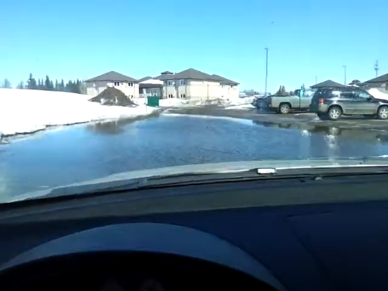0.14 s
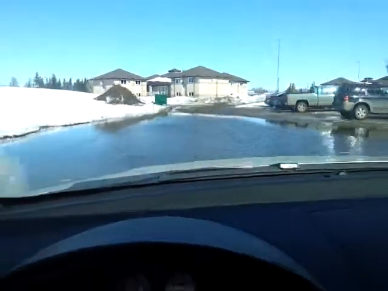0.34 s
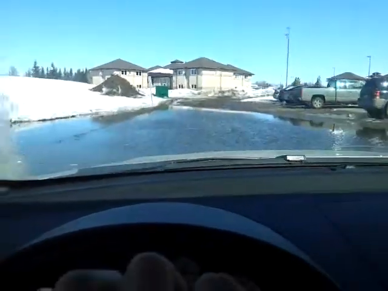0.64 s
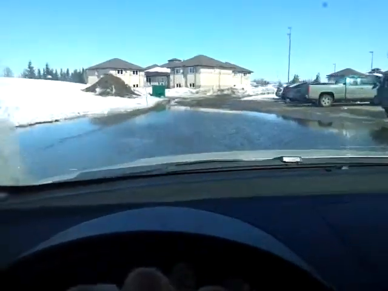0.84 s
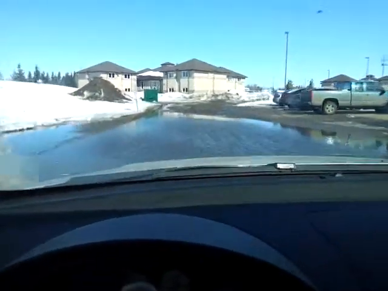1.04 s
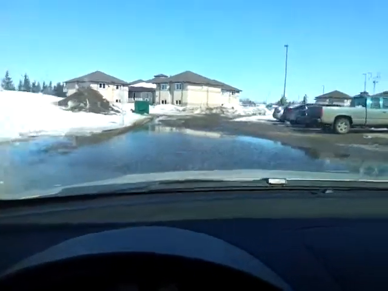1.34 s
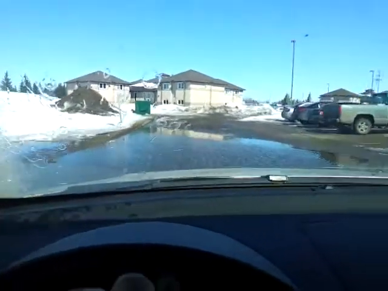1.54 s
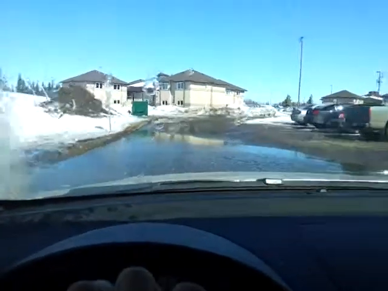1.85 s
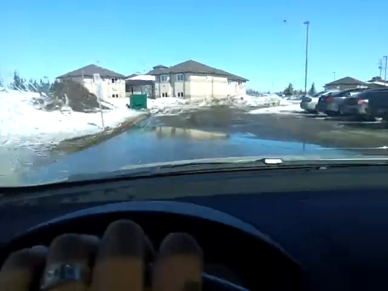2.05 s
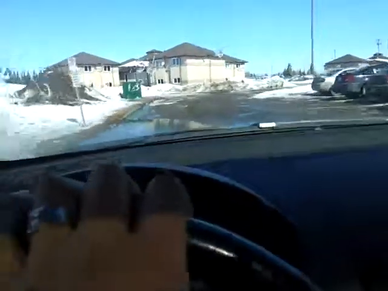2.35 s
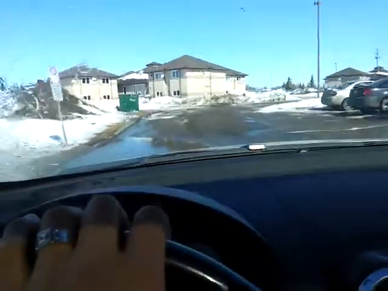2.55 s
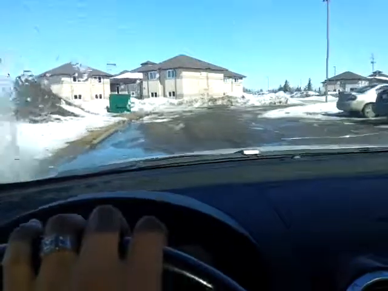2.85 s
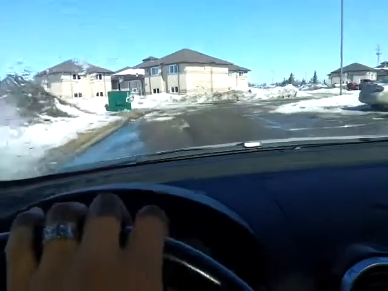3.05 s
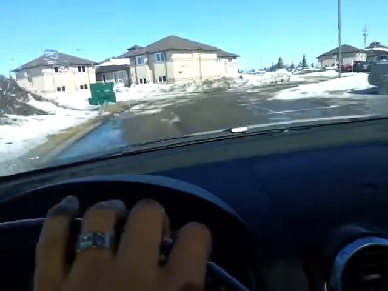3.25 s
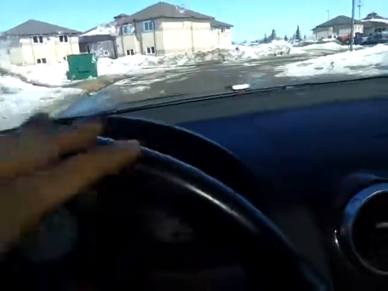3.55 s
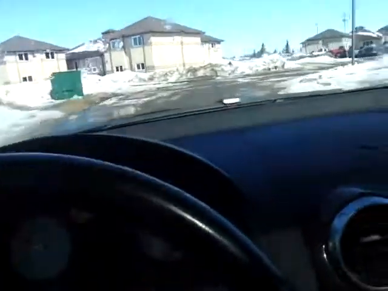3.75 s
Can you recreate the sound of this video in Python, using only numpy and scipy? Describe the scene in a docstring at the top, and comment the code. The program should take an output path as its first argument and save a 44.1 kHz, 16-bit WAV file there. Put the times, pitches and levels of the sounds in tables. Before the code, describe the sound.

Low rumble of a car rolling through meltwater, heard inside, with bumps and faint splashes

```python
"""Inside a car that rolls through a long puddle of meltwater, windows shut.
From the start the road, as filtered noise, shakes the body and booms in the cabin; decaying cosines add thumps.
Water from the tyres, as filtered random impulses, drums on the wheel wells; noise bursts slap there.
From about 1 s the wheels thud over bumps, then stray drops tick on the glass as short noise bursts.
The water fades towards the end as the puddle gets shallow; a steady hiss of air lies beneath."""
import sys
import numpy as np
from scipy import signal
from scipy.fft import rfft, irfft
from scipy.io import wavfile
from scipy.ndimage import uniform_filter1d

SR = 44100
rng = np.random.default_rng(int(sys.argv[2]) if len(sys.argv) > 2 else 0)


def inscribe(sig):
    """Save sig as 16-bit PCM at rate SR to the path in sys.argv[1].

    A 1-D sig is mono; a 2-D sig holds one channel per row.
    Samples are clipped to [-1, 1] before scaling.
    """
    pcm = np.round(np.clip(np.atleast_2d(sig).T, -1, 1) * 32767)
    wavfile.write(sys.argv[1], SR, pcm.astype(np.int16))


N = 171549
TIME = np.arange(N) / SR  # s

# Spectrum of spray and droplets through glass and doors: (frequency [Hz], relative density [dB per Hz])
SPRAY_SPECTRUM = [(1000, -27.5), (1700, -0.5), (2150, 0.5), (2700, -2.5), (3400, -5), (4200, -9.5),
                  (5400, -16), (6000, -23.5), (7000, -31)]
# Jolts of road and water that make the cabin boom: (time [s], peak level [dB], pitch [Hz])
CABIN_THUMPS = [(0.12, -10.5, 134), (.582, -7.5, 132), (.622, -9, 117), (.716, -12, 144),
                (0.788, -10.5, 125), (.918, -11.5, 124), (1.026, -7.5, 106), (1.096, -8, 106),
                (1.281, -9.5, 135), (1.346, -8, 103), (1.427, -7.5, 131), (1.48, -10.5, 115),
                (1.69, -7, 135), (1.771, -11, 123), (2.213, -9.5, 149), (2.444, -13.5, 117),
                (2.731, -13.5, 119), (2.838, -8.5, 121), (3.067, -12.5, 109), (3.166, -14, 120),
                (3.285, -17, 85), (3.571, -14, 104), (3.631, -16.5, 116)]
THUMP_RISE_S, THUMP_FALL_S = 0.008, 0.013  # to 1/e of the peak


def amp(db):
    """Level definition: decibels become an amplitude ratio."""
    return 10 ** (np.asarray(db) / 20)


def unit(x):
    """Power normalisation: scales a signal to rms 1."""
    return x / np.sqrt(np.mean(x ** 2) + 1e-20)


def level(points, axis=1):
    """Amplitude envelope: one dB column, interpolated over time, becomes a gain."""
    points = np.array(points)
    return amp(np.interp(TIME, points[:, 0], points[:, axis]))


def colour(x, spectrum):
    """Spectral shaping: filters along a dB curve, falling 20 dB per octave beyond its ends; rms 1."""
    hz, db = np.transpose(spectrum)
    octave = np.log2(np.fft.rfftfreq(N, 1 / SR) + 1)
    knots = np.log2(hz)
    beyond = abs(octave - np.clip(octave, knots[0], knots[-1]))
    gain = amp(np.interp(octave, knots, db) - 20 * beyond)
    return unit(irfft(rfft(x) * gain, N))


def wander(rate_hz):
    """Low-frequency fluctuation: noise above 2 Hz with a Gaussian roll-off set by the rate; rms 1."""
    hz = np.fft.rfftfreq(N, 1 / SR)
    gain = np.exp(-(hz / rate_hz) ** 2) * (hz > 2)
    return unit(irfft(rfft(rng.standard_normal(N)) * gain, N))


def steady(x, size):
    """Power levelling: divides by the running rms to even out slow chance swells (size in samples)."""
    power = uniform_filter1d(uniform_filter1d(x ** 2, size), size)
    return x / np.sqrt(abs(power) + 1e-9)


def impacts(per_s, spread_db):
    """Shot noise: impulses of uneven size at random instants; rms 1."""
    unevenness_db = spread_db * np.minimum(rng.exponential(1, N), 4)
    sizes = rng.standard_normal(N) * amp(unevenness_db)
    return unit(sizes * (rng.random(N) < per_s / SR))


def swell(at, rise, fall):
    """Transient envelope: Gaussian flanks rise to 1 and fall again, each with its own time."""
    t = TIME - at
    return np.exp(-(t / np.where(t < 0, rise, fall)) ** 2)


def band(hz, width_oct):
    """Band-limited noise: a random-phase bell around one pitch, as heard through the glass; rms 1."""
    # Treble that the glass lets through: (frequency [Hz], gain [dB])
    glass = [(2600, 1), (3000, -3), (3650, 0), (4050, 2), (4500, -3), (5000, 1.5), (5500, 2.5), (6050, -11),
             (6500, -7), (7200, -9.5)]
    f = np.fft.rfftfreq(8192, 1 / SR) + 1
    bell = np.exp(-(np.log2(f / hz) / width_oct) ** 2)
    bell = bell * amp(np.interp(f, *np.transpose(glass)))
    phase = np.exp(2j * np.pi * rng.random(len(f)))
    block = unit(irfft(bell * phase))
    return np.resize(block, N)  # the block repeats every 0.19 s


def road():
    """Broadband excitation: rough ground shakes the body and its air; thumps briefly displace the boom."""
    # Slow shaking of the body: (frequency [Hz], relative density [dB per Hz])
    shake_spectrum = [(8, -30), (16, -11), (26, -5), (35, 0), (47, 1), (57, -5), (80, -14), (130, -40)]
    # Strength of the shaking: (time [s], level [dB])
    shake_level = [(0, -24.5), (1.55, -25.5), (2.3, -27), (3.1, -27.5), (3.89, -31)]
    # Cabin boom with three broad air resonances: (frequency [Hz], relative density [dB per Hz])
    boom_spectrum = [(40, -31), (68, -8.5), (81, -1), (93, -1.5), (106, -1), (120, 1), (140, -4),
                     (163, 0.5), (178, -5.5), (198, -16), (280, -39.5)]
    # Strength of the boom before thumps displace it: (time [s], level [dB])
    boom_level = [(0.03, -15.5), (.25, -19), (0.48, -20.5), (0.6, -17.5), (1.1, -17.3), (1.21, -21.5),
                  (1.3, -16.5), (1.52, -17), (1.62, -19.5), (1.7, -16.5), (1.8, -16.5), (1.92, -21),
                  (2.2, -18.5), (2.3, -20), (2.9, -20), (3.3, -23), (3.43, -30), (3.54, -22), (3.68, -25),
                  (3.86, -29)]
    takeover = 0.55  # share of the random boom that gives way to a thump

    shake = steady(colour(rng.standard_normal(N), shake_spectrum), size=8000)
    boom = steady(colour(rng.standard_normal(N), boom_spectrum), size=3000)
    thumping = sum(swell(at, THUMP_RISE_S, THUMP_FALL_S) for at, _, _ in CABIN_THUMPS)
    boom_left = 1 - np.clip(takeover * thumping, 0, 1)
    return shake * level(shake_level) + boom * level(boom_level) * boom_left


def jolt(at, db, hz, rise, fall):
    """Damped oscillation: the body heaves, or the cabin air booms, in a brief cosine pulse."""
    return amp(db) * np.cos(2 * np.pi * hz * (TIME - at)) * swell(at, rise, fall)


def jolts():
    """Transient response: deep bumps of the wheels and higher, shorter thumps of the cabin air."""
    # Wheels dropping over bumps: (time [s], peak level [dB], pitch [Hz])
    wheel_bumps = [(.939, -13, 45), (1.154, -17, 42), (1.561, -11.5, 45), (1.992, -11, 38),
                   (2.187, -12, 41), (2.48, -14.5, 30)]
    bump_rise_s, bump_fall_s = 0.012, 0.016  # to 1/e of the peak
    bumps = sum(jolt(*row, bump_rise_s, bump_fall_s) for row in wheel_bumps)
    thumps = sum(jolt(*row, THUMP_RISE_S, THUMP_FALL_S) for row in CABIN_THUMPS)
    return bumps + thumps


def water():
    """Superposed impacts: water hits the underside as low drumming, churning and fine spray."""
    # Drumming on floor pan and wheel wells: (frequency [Hz], relative density [dB per Hz])
    drum_spectrum = [(120, -24.5), (195, -0.5), (235, 1), (310, -0.5), (345, -2), (385, -2.5), (485, -7.5),
                     (530, -7.5), (600, -12.5), (800, -24.5), (1500, -55.5)]
    # Tyres churning on the wet road: (frequency [Hz], relative density [dB per Hz])
    churn_spectrum = [(400, -26.5), (620, -1.5), (720, -2), (870, 1.5), (970, -3), (1090, -8), (1190, -6.5),
                      (1310, -11), (1460, -8), (1700, -17.5), (2500, -36)]
    # Strength before flutter: (time [s], drumming level [dB], churning level [dB])
    water_level = [(0, -22, -29), (.45, -23, -30.5), (1.4, -23, -32), (2.1, -23, -33), (2.28, -27, -33),
                   (2.7, -26, -35), (3.12, -27.5, -35.5), (3.43, -31.5, -36.5), (3.6, -32, -36.5),
                   (3.89, -35, -42)]
    # Strength of the spray before flutter: (time [s], level [dB])
    spray_level = [(0, -38), (.3, -41.5), (.85, -42.5), (1.5, -43), (1.9, -46), (2.3, -45), (2.7, -47),
                   (3.1, -46.5), (3.43, -55.5), (3.6, -48.5), (3.89, -54)]

    drum = colour(impacts(per_s=6000, spread_db=1.46), drum_spectrum)
    churn = colour(impacts(per_s=12000, spread_db=0.9), churn_spectrum)
    spray = colour(impacts(per_s=14000, spread_db=1.5), SPRAY_SPECTRUM)
    # each layer flutters by chance, about half a dB rms
    drum = drum * amp(0.62 * wander(rate_hz=15))
    churn = churn * amp(0.5 * wander(rate_hz=22))
    spray = spray * amp(0.5 * wander(rate_hz=18))
    low_water = drum * level(water_level) + churn * level(water_level, axis=2)
    return low_water + spray * level(spray_level)


def slosh(at, db, hz, length):
    """Modulated noise burst: a ragged slap of water swells and dies away in a wheel well."""
    width_oct, roughness = 0.44, 0.23  # half width to 1/e; rms depth of the raggedness
    ragged = unit(1 + roughness * wander(rate_hz=56))
    envelope = np.exp(-((TIME - at) / length) ** 2)
    return amp(db) * envelope * ragged * steady(band(hz, width_oct), size=800)


def sloshes():
    """Superposition: single slaps of water add up in the wheel wells."""
    # Slaps: (time [s], level [dB], bell centre [Hz], half length to 1/e [s])
    slaps = [(0.137, -31, 800, 0.061), (0.53, -19, 282, 0.02), (1.046, -35, 1150, 0.033),
             (1.375, -24.5, 340, 0.041), (2.033, -28, 293, 0.04), (2.657, -35, 300, 0.022),
             (3.049, -29, 720, 0.037), (3.138, -22.5, 298, 0.017), (3.551, -30, 610, 0.017),
             (3.657, -36, 815, 0.016)]
    return sum(slosh(*row) for row in slaps)


def patter():
    """Sparse shot noise: separate small droplets stand out of the spray."""
    # Fine droplets pattering on the body: (time [s], level [dB])
    patter_level = [(0, -51.5), (1.5, -51.5), (2.3, -55.5), (3.1, -51), (3.89, -60)]
    return colour(impacts(per_s=700, spread_db=1.5), SPRAY_SPECTRUM) * level(patter_level)


def drop(at, db, hz, length):
    """Impulsive excitation: a drop bursts on the windscreen as a bright tick with a faint cabin tail."""
    rise_s, width_oct = 0.0018, 0.65  # linear rise; half width to 1/e
    tail_db, tail_s = -20.5, 0.019  # relative to the tick; decay to 1/e
    t = np.maximum(TIME - at, 0)
    tick = np.exp(-(t / length) ** 2)
    tail = amp(tail_db) * np.exp(-t / tail_s)
    envelope = np.minimum(t / rise_s, 1) * (tick + tail)
    return amp(db) * envelope * steady(band(hz, width_oct), size=200)


def drops():
    """Superposition: stray drops add up on the glass."""
    # Drops, before the rise and tail: (time [s], tick level [dB], bell centre [Hz], tick length to 1/e [s])
    splashes = [(1.432, -46, 4000, 0.0055), (1.669, -38, 4000, 0.004), (1.67, -32.5, 3400, 0.0016),
                (2.241, -46, 4600, .008), (2.455, -45, 4330, 0.0074), (2.6, -42, 4900, 0.0057),
                (2.627, -48, 5600, 0.011), (2.65, -49, 5170, 0.005), (2.806, -46.5, 4520, .005),
                (2.858, -36.5, 3300, 0.0076), (2.864, -36, 4230, .003), (2.915, -37, 3400, .005),
                (3.567, -49, 4200, .006), (3.665, -45, 3000, .003), (3.703, -44, 3200, .012)]
    return sum(drop(*row) for row in splashes)


def air():
    """Stationary noise: an even hiss of air in the cabin."""
    # Hiss of air: (frequency [Hz], relative density [dB per Hz])
    air_spectrum = [(900, -9.5), (1600, -3.5), (2100, 0), (2700, 0), (3400, -6.5), (4300, -9.5),
                    (5450, -13.5), (5950, -20.5), (6600, -21), (7200, -27)]
    air_db = -46.5  # rms level
    return amp(air_db) * colour(rng.standard_normal(N), air_spectrum)


def scene():
    """Linear superposition: all sources add as heard from the driver's seat."""
    cabin = road() + jolts()
    wet = water() + sloshes() + patter() + drops()
    return (cabin + wet + air())[None]


def record(dry):
    """Band limitation: a small camera's narrow band, as a linear-phase low-pass."""
    edge_hz = 7250
    lowpass = signal.firwin(601, edge_hz, window=("kaiser", 9), fs=SR)
    return signal.oaconvolve(dry, lowpass[None], "same")


dry = scene()
out = record(dry)
inscribe(out)
```